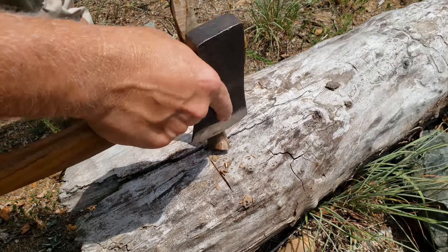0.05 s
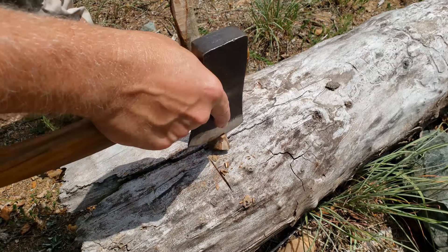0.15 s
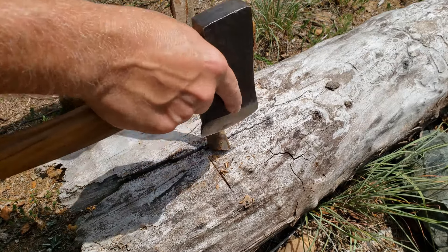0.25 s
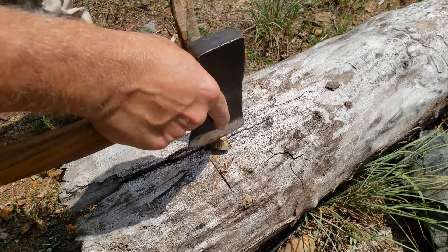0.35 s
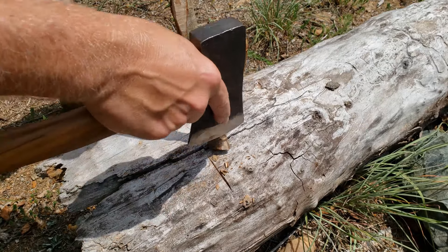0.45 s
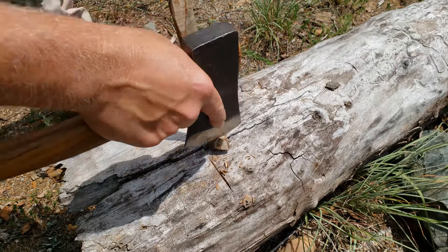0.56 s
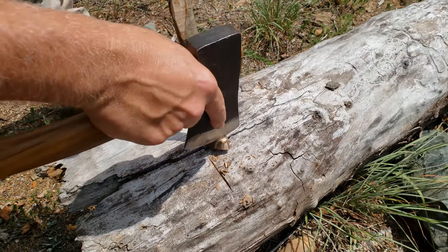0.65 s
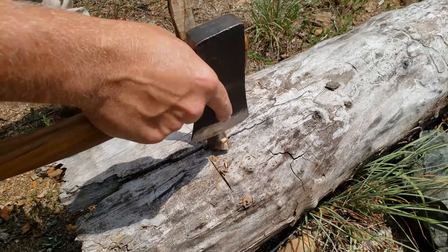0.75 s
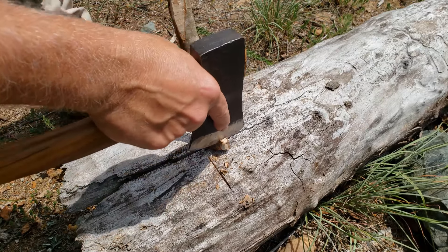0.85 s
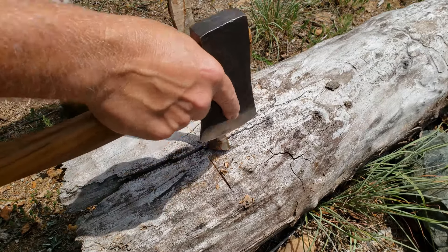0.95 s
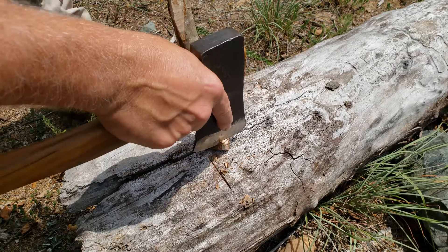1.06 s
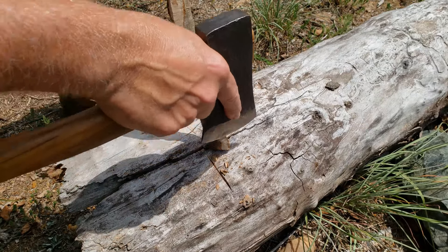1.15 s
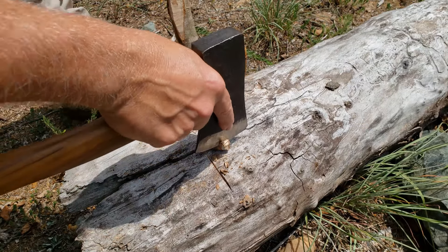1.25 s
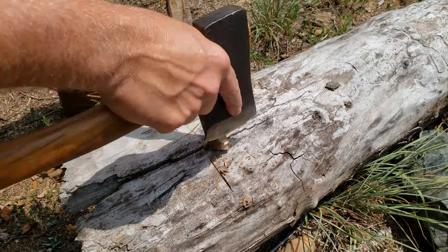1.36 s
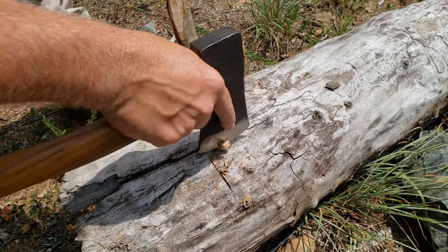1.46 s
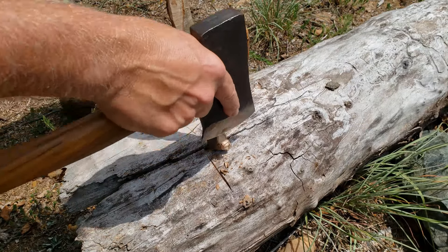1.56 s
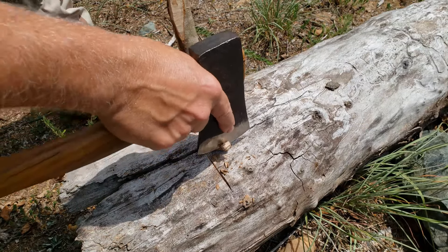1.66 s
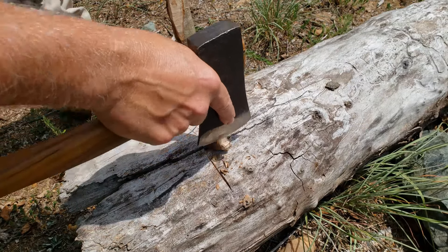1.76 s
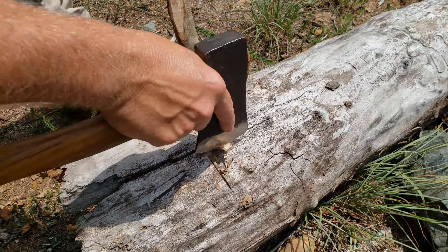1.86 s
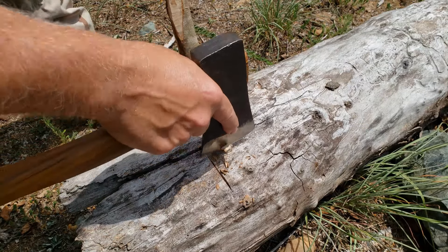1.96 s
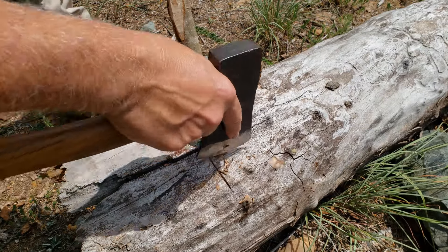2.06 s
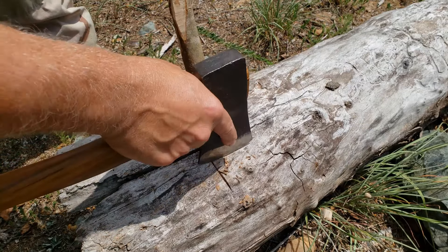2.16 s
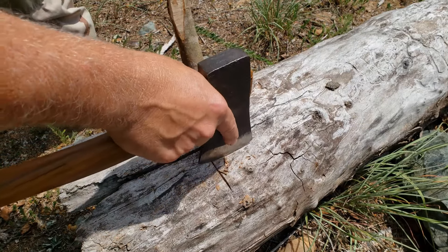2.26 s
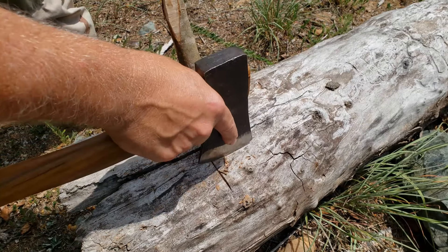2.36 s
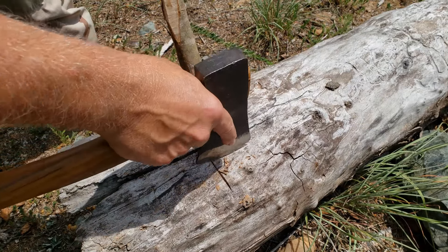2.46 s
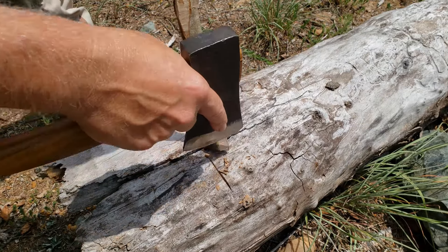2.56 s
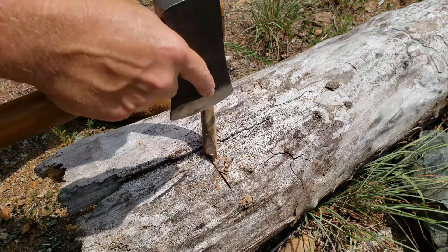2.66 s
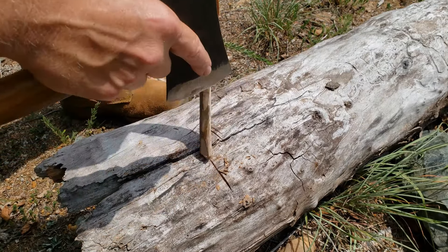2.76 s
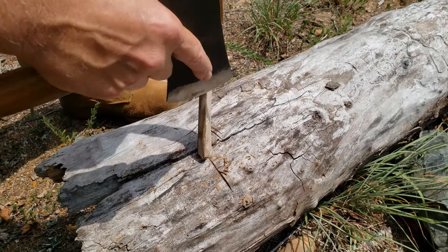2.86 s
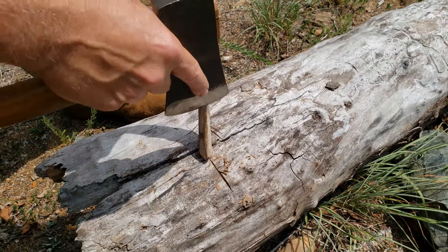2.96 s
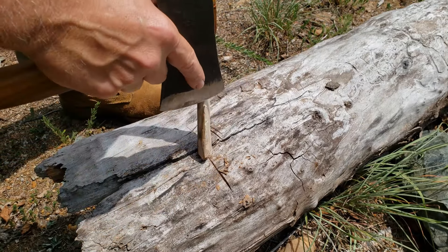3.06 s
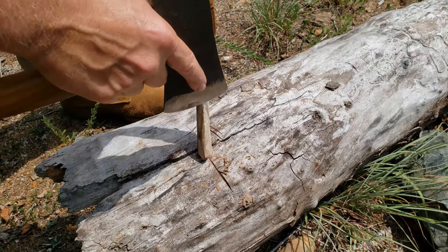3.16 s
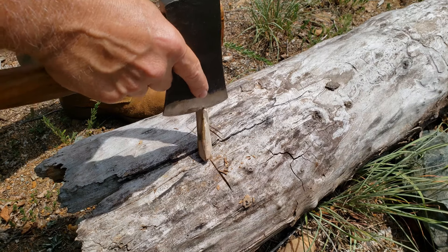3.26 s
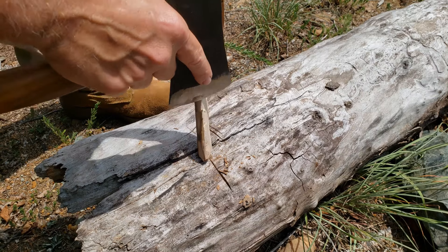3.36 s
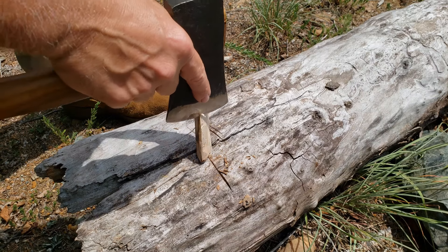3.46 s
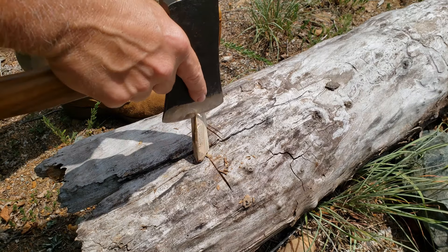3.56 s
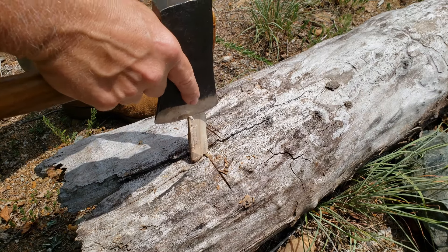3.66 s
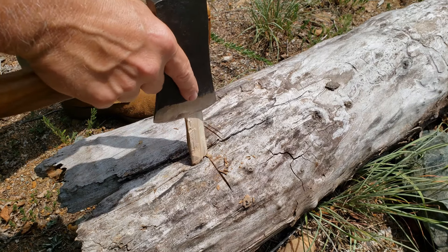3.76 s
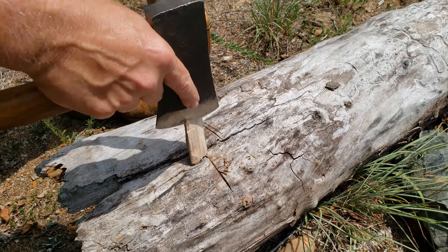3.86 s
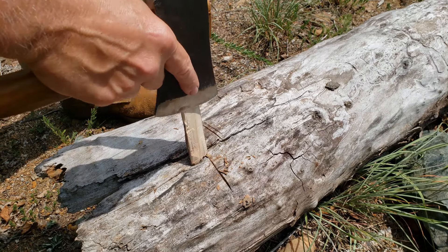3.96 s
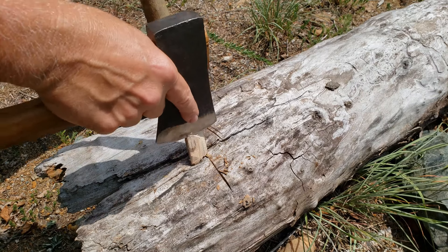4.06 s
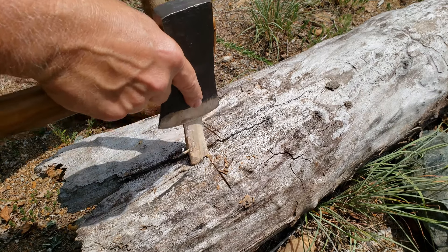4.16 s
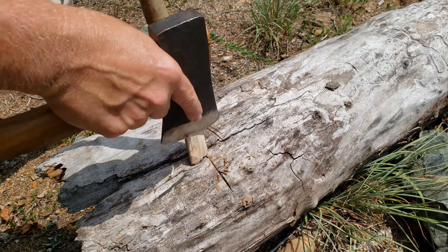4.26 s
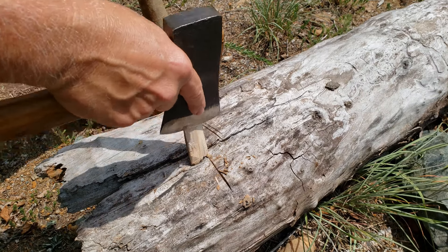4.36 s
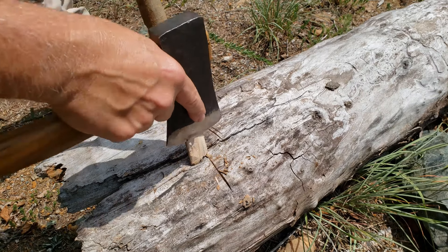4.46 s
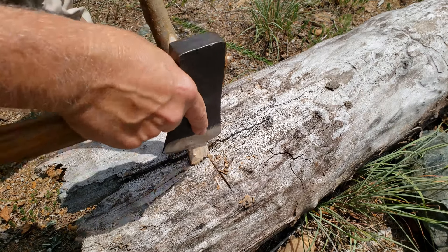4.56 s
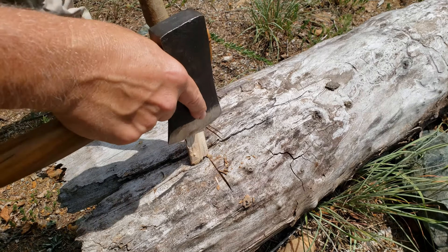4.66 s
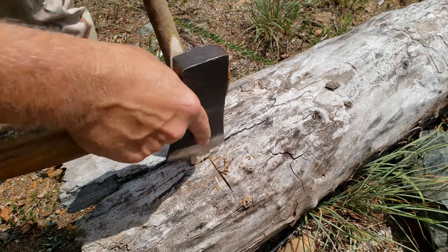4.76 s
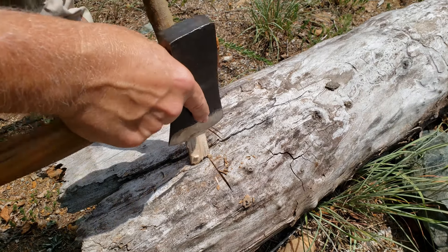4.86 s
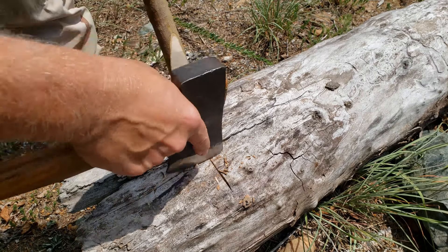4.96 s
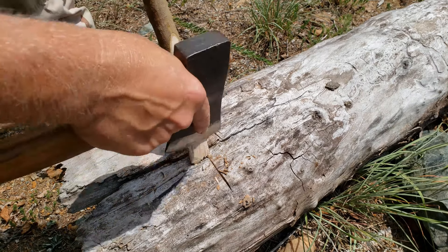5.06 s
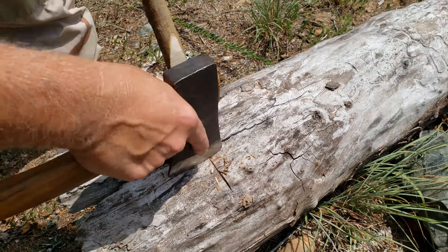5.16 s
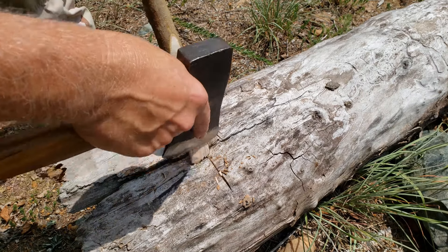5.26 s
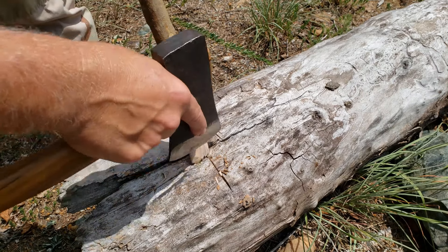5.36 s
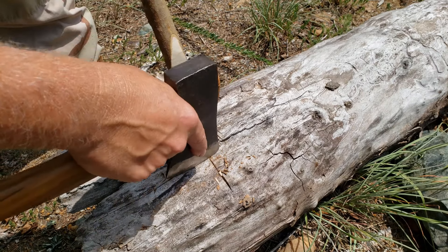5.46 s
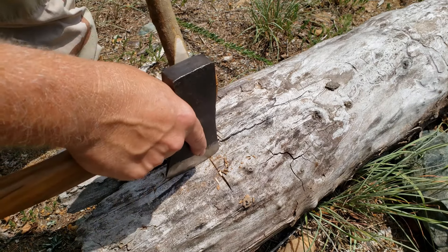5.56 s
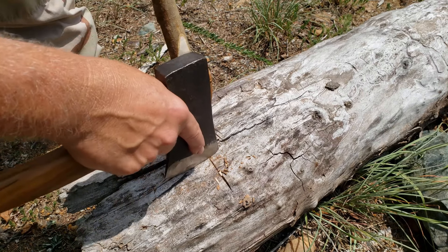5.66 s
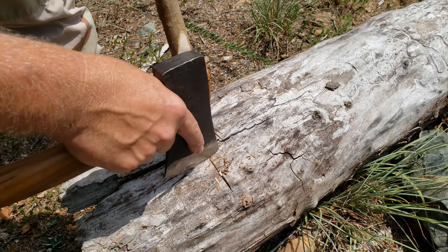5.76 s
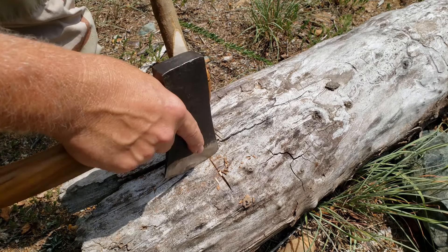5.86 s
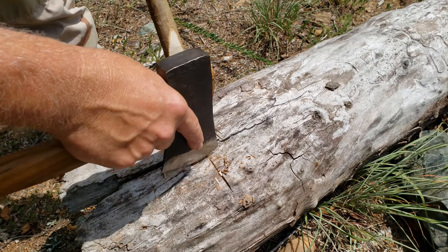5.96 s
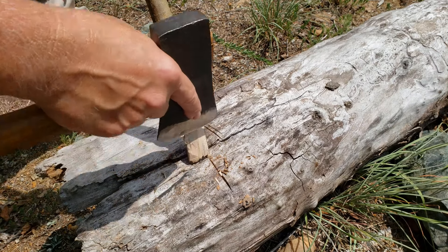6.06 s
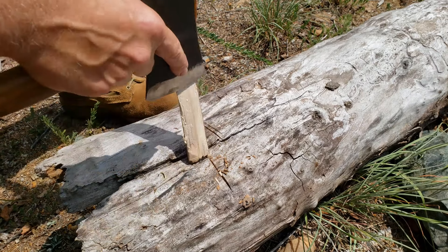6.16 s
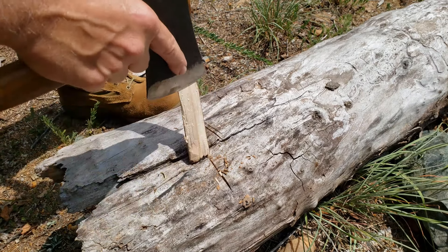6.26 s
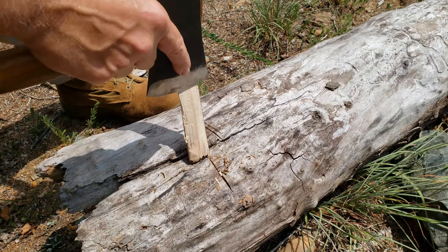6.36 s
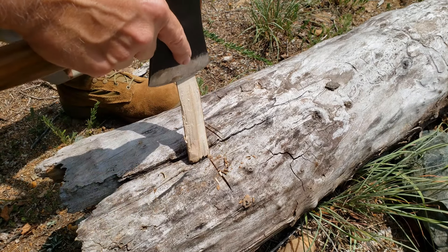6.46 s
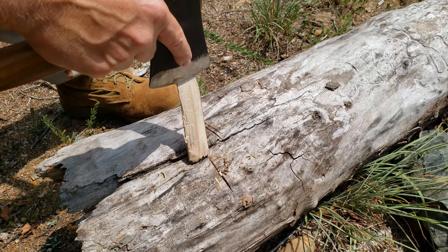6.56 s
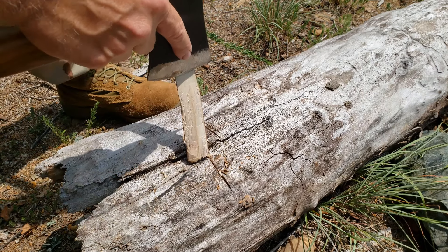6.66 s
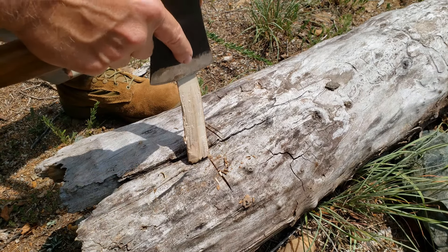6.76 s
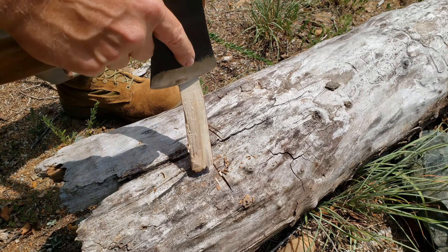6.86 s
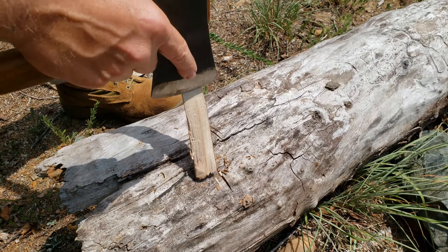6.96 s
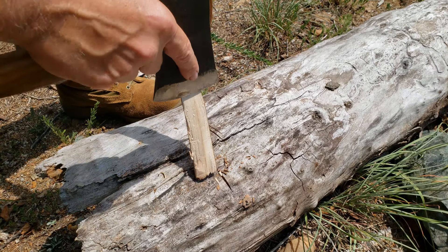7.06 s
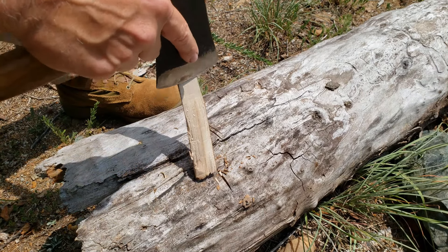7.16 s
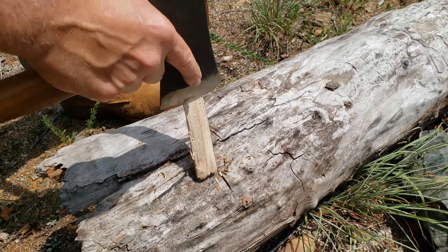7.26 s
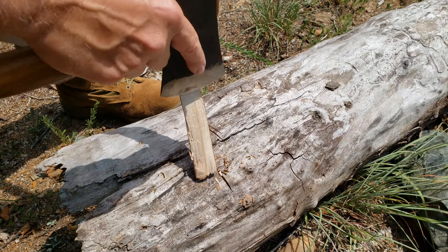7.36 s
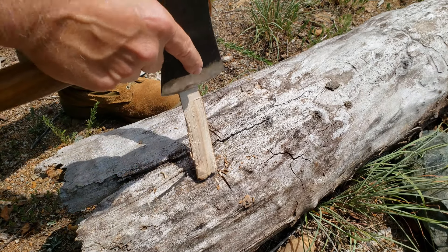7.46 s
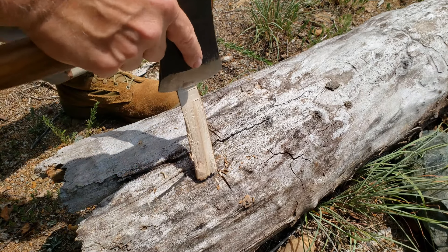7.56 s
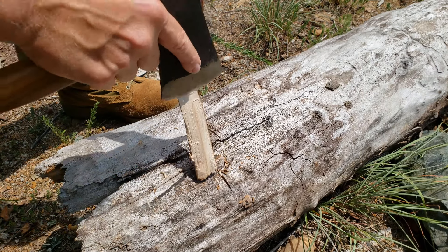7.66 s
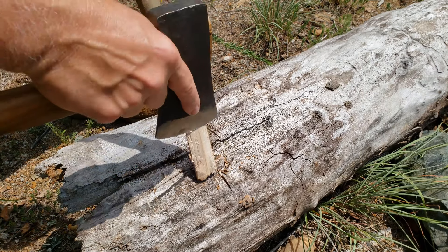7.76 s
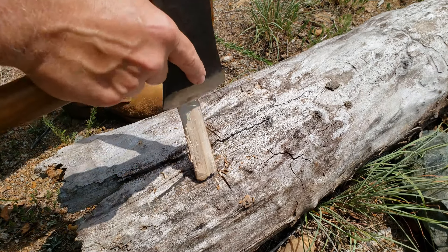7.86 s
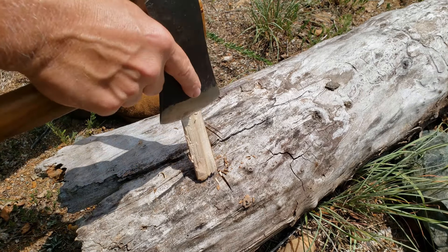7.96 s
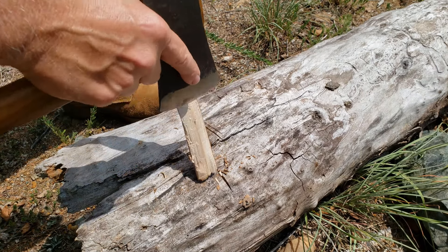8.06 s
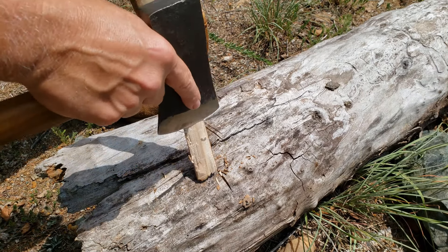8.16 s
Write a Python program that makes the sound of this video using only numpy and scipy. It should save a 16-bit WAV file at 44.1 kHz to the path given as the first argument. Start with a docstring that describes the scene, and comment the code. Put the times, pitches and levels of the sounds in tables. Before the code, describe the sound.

A hatchet works on a dry stick standing on a log, close by outdoors and slightly to the left. From the start to about 2.4 seconds comes a quick, even run of about a dozen blows, roughly five a second, growing louder. Each is a sharp crack of steel into wood with a hollow thud from the log. After a short lull, light taps and small scrapes begin around 3.2 seconds. From 4 to 6 seconds the blade shaves the stick in quick, quiet rasping strokes, with creaks and hissing fibres, and three firmer knocks land between 5.2 and 5.6 seconds. Faint ticks and brief scrapes follow from 6 to 7.4 seconds. Then about four moderate knocks mix with rasps until just after 8 seconds. Underneath, light wind rumbles on the microphone over a faint outdoor hush.

```python
"""Hatchet on a dry stick

Close by, outdoors, a hatchet chops and shaves a dry stick that stands on a hollow-sounding log.
The edge cracks into the stick, ringing wood and steel, and drives it against the log, which thuds.
As the edge slides it sticks and slips, rasping and tearing fibres. Light wind rumbles on two
microphone ports over a faint outdoor hush."""
import sys
import numpy as np
from scipy import signal
from scipy.fft import rfft, irfft
from scipy.io import wavfile
from scipy.ndimage import uniform_filter1d

SR = 44100
rng = np.random.default_rng(int(sys.argv[2]) if len(sys.argv) > 2 else 0)


def dump(signal):
    """Clip the signal to [-1, 1] and save it as 16-bit WAV at the path in sys.argv[1]."""
    limited = np.clip(np.atleast_2d(signal).T, -1, 1)
    pcm = np.round(limited * 32767).astype(np.int16)
    wavfile.write(sys.argv[1], SR, pcm)


N = 362502


def gain_of(db):
    """Decibels to gain."""
    return 10 ** (np.asarray(db) / 20)

def unit_rms(x):
    """Scales to rms 1."""
    return x / np.sqrt(np.mean(x ** 2) + 1e-20)

def curve_at(points, hz):
    """Reads a curve on a log frequency axis."""
    freqs, values = np.transpose(points)
    return np.interp(np.log(hz + 1), np.log(freqs + 1), values)

def colour(x, response):
    """Multiplies the spectrum by a function of frequency."""
    return irfft(rfft(x) * response(np.fft.rfftfreq(N, 1 / SR)), N)

def eq(x, points):
    """Applies an EQ curve of (freq_hz, gain_db) points."""
    return colour(x, lambda hz: gain_of(curve_at(points, hz)))

def fader(points):
    """A gain ride through (time_s, level_db) points."""
    return gain_of(np.interp(np.arange(N) / SR, *np.transpose(points)))

def add(mix, start_s, sound):
    """Mixes a sound in at start_s."""
    part = mix[round(start_s * SR):][:len(sound)]
    part += sound[:len(part)]

def ring(modes, push, spread=0., polarity=1):
    """Dying modes struck by a push, peak 1; spread varies pitch and level, polarity -1 alternates signs."""
    t = np.arange(6000) / SR
    body = np.zeros(len(t))
    for k, (hz, db, t60) in enumerate(modes):
        detune, accent = spread * rng.standard_normal(2)
        decay = gain_of(db + 100 * accent - 60 * t / t60)
        body += polarity ** k * decay * np.sin(2 * np.pi * hz * (1 + detune) * t)
    out = signal.oaconvolve(body, push)[:len(t)]
    return out / abs(out).max()

def air_noise(spectrum, correlation, patchy_db):
    """Stereo noise with drifting patches in its spectrum, rms 1."""
    frames, hz = N // 256 + 5, np.fft.rfftfreq(1024, 1 / SR)
    a, b, c, d, patches = rng.standard_normal((frames, 513, 5)).T
    patches = unit_rms(uniform_filter1d(uniform_filter1d(patches, 12, 0), 14, 1))
    shared = np.clip(curve_at(correlation, hz), 0, 1)[:, None]
    left = a + 1j * b
    right = shared * left + np.sqrt(1 - shared ** 2) * (c + 1j * d)
    spectra = np.array([left, right]) * gain_of(patchy_db * patches)
    stereo = signal.istft(spectra, nperseg=1024, noverlap=768)[1][:, :N]
    return unit_rms(eq(stereo, spectrum))


# Wind tone: freq_hz, gain_db
WIND_EQ = [(12, -60), (20, -16.5), (43, -4), (81, -4), (118, -6.5), (170, -12.5), (195, -15), (329, -23),
           (362, -37), (500, -31), (650, -56), (1100, -120)]
# Likeness of left and right: freq_hz, correlation
WIND_CORRELATION = [(30, .55), (70, 0.72), (150, .95)]
# Gusts: time_s, level_db
GUSTS = [(0.0, -48), (0.2, -56.5), (0.39, -57), (0.62, -54), (0.8, -47), (2.15, -53), (2.98, -55.5),
         (4.74, -53.5), (5.24, -51.5), (5.95, -47.5), (6.45, -50.5), (6.98, -50), (7.44, -51),
         (8.22, -51.5)]

def wind():
    """Light gusts rumble on the microphone ports."""
    return fader(GUSTS) * air_noise(WIND_EQ, WIND_CORRELATION, patchy_db=-0.5)


# Hush tone: freq_hz, gain_db
HUSH_EQ = [(180, -39.5), (300, -7), (355, -9.5), (658, -20.5), (1200, -22.5), (1490, -25.5), (2870, -26.5),
           (3060, -29), (3680, -32.5), (7310, -26), (8350, -40), (15200, -34), (16300, -43.5)]
# Hush swells: time_s, mid_band_db
HUSH_SWELLS = [(0.0, -70), (0.43, -78), (2.27, -71.5), (2.61, -78), (4.53, -71.5), (4.83, -66), (5.47, -62),
               (5.7, -71), (6.71, -77), (8.22, -76.5)]

def hush():
    """A faint outdoor bed, narrow in the lows and wide in the highs."""
    bed = air_noise(HUSH_EQ, correlation=[(300, 0.89), (8000, 0.15)], patchy_db=0.55)
    mid_band = colour(bed, lambda hz: (hz > 700) * (hz < 2600))
    return fader(HUSH_SWELLS) * bed / np.sqrt(np.mean(mid_band ** 2))


def slips(per_s, spread_db):
    """Stick-slip clicks of random sign and uneven size, in clumps."""
    clumps = gain_of(1.7 * unit_rms(uniform_filter1d(rng.standard_normal(N), 250)))
    size = gain_of(spread_db * np.minimum(rng.exponential(1, N), 4)) * rng.standard_normal(N)
    return clumps * size * (rng.random(N) < per_s / SR)

def resonances(x, peaks, waver_db):
    """Narrow peaks, each swelling and fading by itself as the edge travels; rms 1."""
    out = np.zeros(N)
    for pitch, width, db in peaks:
        waver = unit_rms(uniform_filter1d(uniform_filter1d(rng.standard_normal(N), 1500), 1500))
        band = colour(x, lambda hz: 1 / (1 + (2 * (hz - pitch) / width) ** 2))
        out += gain_of(db + waver_db * waver) * band
    return unit_rms(out)


# Tone of scraped wood: freq_hz, gain_db
RASP_EQ = [(350, -43), (600, 3), (963, -11.5), (1070, 2.5), (1370, -16), (1500, -29.5), (2120, -10.5),
           (2400, -5.5), (3170, -15.5), (4060, -11.5), (7000, -19), (9100, -35.5), (15400, -120)]
# Stick resonances under the slips: pitch_hz, width_hz, level_db
CREAK_PEAKS = [(1250, 130, 0), (1626, 500, -5.5), (2075, 190, -3), (3720, 360, -7), (4860, 250, -13)]

def wood_rasp(friction):
    """Slips rasp and creak on the stick; the grain colours the rasp in patches."""
    spectra = signal.stft(unit_rms(eq(friction, RASP_EQ)), nperseg=256)[2]
    grain = unit_rms(uniform_filter1d(uniform_filter1d(rng.standard_normal(spectra.shape), 2, 0), 16, 1))
    rasp = unit_rms(signal.istft(spectra * gain_of(9.0 * grain), nperseg=256)[1][:N])
    return unit_rms(rasp + 1.1 * resonances(friction, CREAK_PEAKS, waver_db=5))


# The steel head sings: pitch_hz, width_hz, level_db
SONG_PEAKS = [(3096, 200, 0), (7270, 580, -11), (8630, 120, -13.5)]
# Tone of tearing fibres: freq_hz, gain_db
FIBRE_EQ = [(3240, -18), (5500, -6.5), (6480, -8), (7600, -10), (8900, -7), (9360, -17), (11600, -9),
            (12600, -12.5), (15100, -14.5), (16300, -23)]
# Slides of the edge: peak_s, rise_s, fall_s, rasp_db, then relative to it song_db, hiss_db, rumble_db
STROKES = [(0.003, .003, .03, -52, 4, -10, 20), (0.145, .01, 0.078, -57, 0, 1.5, 9.5),
           (1.041, 0.0044, 0.006, -40, -4, 5, 16), (1.52, .02, .07, -67.5, -9, 5, 3),
           (1.729, 0.075, 0.039, -59, -9, -7.5, 0.5), (1.93, .07, 0.043, -62, -7, -0.8, 8),
           (2.101, 0.058, 0.039, -58, -5.5, 0, 1), (2.455, 0.0072, 0.077, -64.5, -16, 1, 1),
           (3.167, .003, 0.037, -60.5, 13, -15, 12.5), (3.4, 0.079, 0.015, -68.5, 5.5, -24, 4),
           (3.642, 0.038, 0.051, -55, 0, -2.1, 9), (3.999, .09, 0.12, -63.5, -14, -3, 7),
           (4.187, 0.0079, 0.051, -52.5, 4, -20, -4.5), (4.28, 0.034, 0.022, -47, 6.5, -0.3, 12.5),
           (4.421, .004, 0.033, -58.5, 2.5, -11, 13.5), (4.494, 0.0364, 0.03, -50.5, 7.5, 2, 9),
           (4.633, 0.064, .037, -57, -3, -14, 4), (4.706, 0.041, 0.055, -50, -0.5, 1.5, 11),
           (4.85, 0.074, 0.041, -49.5, -7, -8.5, -3.5), (4.944, 0.045, 0.016, -47.5, 1.5, 4, 2.5),
           (5.036, 0.036, 0.11, -51, 0, -13, -1.5), (5.172, 0.057, 0.013, -47.5, 0, 6.2, 14),
           (5.271, 0.066, 0.06, -49, -1, -7, -2), (5.375, .055, 0.0079, -42, -16, -1, 7),
           (5.5, 0.08, 0.076, -49.5, -3, -3, 2), (5.626, 0.064, 0.011, -48, 4, 4.5, 1),
           (5.715, 0.18, 0.4, -64.5, -27, 1.1, -1), (6.405, .004, .03, -65, 1, -14, 6),
           (6.475, 0.033, 0.084, -62, 6.5, -6.5, 6.5), (6.637, 0.063, 0.05, -65, 5, -21, 6),
           (6.734, 0.017, 0.012, -63, 14, -21, 10), (6.86, 0.035, 0.056, -78, 14, -8.5, 10),
           (6.956, 0.013, 0.018, -64, 12.5, -8, 7.5), (7.16, 0.021, 0.034, -62, 3, -6, 18.5),
           (7.224, 0.06, 0.021, -58.5, 0, -12, -6), (7.358, 0.054, 0.03, -61, 9, -16, 3.5),
           (7.433, 0.057, 0.015, -54, 0, -8, 1), (7.485, 0.045, 0.011, -45, 3, -9, 7),
           (7.682, 0.0035, 0.046, -62, -19, -7, 16), (7.915, 0.034, 0.052, -41, 6.5, -5.5, 2.5),
           (7.985, 0.0072, 0.029, -71, -22, -11, 16), (8.124, 0.0061, 0.086, -47.5, -1.5, -8, 0.5)]

def shaving_strokes():
    """The edge slides along the stick: wood rasps, the head sings, fibres hiss, the log rumbles."""
    start_db, end_db, fade_in_share, fade_out_s = -14, -15, 0.46, 0.0013
    settle_db, settle_db_per_s, settle_s = -8.5, 350, .08
    friction = slips(per_s=9000, spread_db=3.4)
    rasp = wood_rasp(friction)
    song = resonances(friction, SONG_PEAKS, waver_db=6.5)
    hiss = unit_rms(eq(1.4 * friction + slips(14000, 0.52), FIBRE_EQ))
    rumble = unit_rms(signal.oaconvolve(slips(690, 3.0), ring(LOG_MODES[2:5], np.hanning(50)))[:N])
    out = np.zeros(N)
    for peak_s, rise_s, fall_s, rasp_db, song_db, hiss_db, rumble_db in STROKES:
        start_s, end_s = max(peak_s - rise_s, 0), peak_s + fall_s
        span = np.arange(round(start_s * SR), min(round((end_s + settle_s) * SR), N))
        t = span / SR
        swell_db = np.interp(t, (start_s, peak_s, end_s), (start_db, 0, end_db))
        after_s = np.maximum(t - end_s, 0)  # light contact lingers after the stroke
        tail_db = settle_db * np.minimum(after_s / .004, 1) - settle_db_per_s * after_s
        fade_in = (t - t[0]) / (fade_in_share * rise_s)
        fades = np.clip(np.minimum(fade_in, (t[-1] - t) / fade_out_s), 0, 1)
        layers = (gain_of(swell_db) * rasp[span]  # the other layers follow most of this swell
                  + gain_of(song_db + .85 * swell_db) * song[span]
                  + gain_of(hiss_db + .92 * swell_db) * hiss[span]
                  + gain_of(rumble_db + .8 * swell_db) * rumble[span])
        out[span] += fades * gain_of(rasp_db + tail_db) * layers
    return out


# Body of the log: pitch_hz, level_db, t60_s
LOG_MODES = [(136.5, -9.5, 0.076), (202.6, -0.06, 0.081), (267.2, 1.5, 0.096), (399.5, 0.5, .05),
             (518.5, -1.16, 0.034), (639, -11, 0.036)]
# Blows on the log: start_s, knock_db, boom_db, boom_lag_s
THUDS = [(0.001, -37, -37.5, 0.00048), (0.1153, -26, -25.5, 0.011), (0.3334, -21.5, -22.5, .006),
         (0.586, -19, -23, .008), (0.814, -15.5, -19.5, .009), (1.0305, -18.5, -19, .01),
         (1.2546, -14.5, -16.5, .003), (1.4543, -15.5, -18, .018), (1.6489, -18.5, -17.5, .012),
         (1.84, -17, -19, .011), (2.0146, -24, -26, 0.00052), (2.0343, -17, -20.5, 0.0079),
         (2.2055, -19, -16.5, .004), (2.233, -10.5, -8.5, .003), (2.3675, -18, -17.5, .01),
         (2.3906, -19.5, -14, .006), (3.163, -43.5, -42.5, 0.00078), (3.413, -41, -35, 0.0016),
         (3.591, -40, -41, 0.0063), (3.647, -44, -34, 0.00099), (3.951, -50, -38, 0.0012),
         (4.262, -39, -48, 0.00062), (4.412, -53, -44, 0), (4.482, -38, -51, 0.0077),
         (4.681, -37, -33, 0.0011), (4.95, -34, -34, 0.00025), (5.174, -25.5, -21.5, 0.014),
         (5.339, -36.5, -44.5, 0), (5.3787, -23, -12.5, .006), (5.631, -16.5, -15, 0.0035),
         (5.6494, -52, -21.5, 0), (6.397, -39.5, -43, 0.0013), (6.737, -60.5, -42, 0.0025),
         (6.956, -65, -46, 0), (7.221, -48.5, -44, 0.0017), (7.469, -35, -37.5, 0.0059),
         (7.661, -32, -27, 0.0034), (7.874, -25.5, -27.5, .008), (7.8985, -25.5, -54, 0.0011),
         (8.1096, -31.5, -40, .01)]

def log_thuds():
    """The stick knocks on the log; the weight of the blow follows, booms and knocks again."""
    contact_s, first_boom_db, rebound_db, ground_db = .0012, -6, -2.5, -10.5
    push = np.sin(np.pi * np.arange(0, 1, 1 / (contact_s * SR))) ** 2
    lowest = gain_of(LOG_MODES[0][1]) * ring(LOG_MODES[:1], push)
    highest = gain_of(LOG_MODES[5][1]) * ring(LOG_MODES[5:], push)
    ground_thump = ring([(62, -6, 0.078), (89, 0.5, 0.13)], np.hanning(200))
    # Neighbouring modes radiate with opposite sign.
    boom = ring(LOG_MODES[1:3], push, polarity=-1) + lowest + gain_of(ground_db) * ground_thump
    knock = ring(LOG_MODES[3:5], push, polarity=-1) - highest
    out = np.zeros(N)
    for start_s, knock_db, boom_db, lag_s in THUDS:
        add(out, start_s, gain_of(knock_db) * knock + gain_of(boom_db + first_boom_db) * boom)
        add(out, start_s + lag_s, gain_of(knock_db + rebound_db) * knock + gain_of(boom_db) * boom)
    return out


# Steel head, damped by hand and wood: pitch_hz, level_db, t60_s
HEAD_MODES = [(2700, -12.5, 0.0068), (3097, -9, 0.012), (3601, -2.5, 0.0058), (4392, -4, 0.0027),
              (5090, -13.5, 0.0054), (5690, -9.5, 0.0039), (6160, -17, 0.0073)]
# Dry stick: pitch_hz, level_db, t60_s
STICK_MODES = [(1160, -11.5, 0.0098), (1190, -5.5, .014), (1643, -1, 0.0065), (1940, -11, 0.0033),
               (2300, -4, 0.0027)]
# Thin edge: pitch_hz, level_db, t60_s
EDGE_MODES = [(7080, -3.5, 0.0043), (7700, -6.5, 0.0023), (11300, -0.5, 0.0019), (12700, -5.5, 0.0033),
              (14700, -6, 0.0026)]
# Bites and ticks: start_s, head_db, then relative to it stick_db, edge_low_db, edge_high_db
BITES = [(0.0024, -45.5, 8.5, -23, -4.5), (0.1108, -39.5, 5.5, -33, -22), (0.128, -40.5, -7, 6, -29),
         (0.3351, -21, 2, -9.5, -15), (0.5874, -18.5, 1, -9, -15), (0.8138, -20, 5, -22, -15),
         (0.827, -21, -4, -7.5, -18), (1.0309, -13.5, -0.5, -35, -32.5), (1.2513, -6.5, -7.5, -19, -35),
         (1.4558, -20.5, 4, -25, -41), (1.4615, -35.5, 3.5, 2, -17.5), (1.6475, -27, 9, -11, -25),
         (1.6598, -29.5, -15, 3.5, 0), (1.839, -18.5, -1, -37, -13), (1.851, -24.5, -0.6, -2.5, -15),
         (2.0154, -23, -2, -32, -26), (2.0305, -22.5, -0.5, -5.5, -9.5), (2.207, -9, -11, -18, -33),
         (2.2218, -28, -1.8, 13, 9), (2.2326, -20, 3, -12, -1), (2.368, -13.5, -2.5, -19, -48),
         (2.391, -31.5, 8.5, -6, -3), (3.1655, -49.5, -3.5, -12, -18), (3.4123, -33, -9.5, 5, 7),
         (3.5926, -38.5, 5.5, -15, -53), (3.6938, -47, -14, 5.5, -9), (3.715, -41, -20, -6, -4),
         (3.8397, -58, -19, 11.5, -30), (4.0512, -39, -11, 0.5, -36), (4.415, -38, -8, -9, -33),
         (4.4875, -38, -21, 8, -26), (4.608, -44, -10, -6, -33), (4.688, -51, -13, -5, -13),
         (5.1755, -26.5, -4, -13, -4), (5.205, -48, -19, -13, 0), (5.3774, -25, 2.2, -10, -3.5),
         (5.6293, -21, 1.5, -3.5, -7), (5.8609, -54.5, 7, -31, -31), (6.028, -55, 5, -17, -16),
         (6.052, -56, 5, -5, -1.1), (6.071, -54.5, 0, 4, -9), (6.141, -63, 14.5, -27, -18.5),
         (6.2114, -64, 13, -19, -11), (6.3988, -29, -2.5, -38, -47), (7.142, -65.5, 15.5, 12, -13),
         (7.222, -58, 16, 2, -26), (7.464, -35, 3, -3, -24), (7.49, -47, 14.5, -16, -23),
         (7.6621, -33, 12, -4.5, -31), (7.8765, -28.5, 14.5, -35.5, -31), (7.893, -38.5, 15.5, -27, -22),
         (7.899, -29, 1, -19, -10), (8.111, -31, 3.5, -27, -27)]

def edge_bites():
    """A sharp contact and a dying burst of splinters ring head, stick and edge."""
    out, t = np.zeros(N), np.arange(1500) / SR
    for start_s, head_db, stick_db, edge_low_db, edge_high_db in BITES:
        splinter_s = 0.0055 * gain_of(-0.17 * (head_db + 28))  # harder blows splinter more briefly
        push = 0.44 * rng.standard_normal(len(t)) * np.exp(-t / splinter_s)
        push[0] = -2.0  # the contact
        for modes, part_db in ((HEAD_MODES, 0), (STICK_MODES, stick_db),
                               (EDGE_MODES[:2], edge_low_db), (EDGE_MODES[2:], edge_high_db)):
            add(out, start_s, gain_of(head_db + part_db) * ring(modes, push, spread=.01))
    return out


def reflections(x, tone, t60_s, onset_s=0.):
    """Random dying reflections; four sets crossfade, as hand and stick keep moving."""
    t, out = np.arange(round(t60_s * SR)) / SR, np.zeros(N)
    envelope = gain_of(-60 * t / t60_s) * np.clip((t - onset_s) / 0.0048 + .1, 0, 1)
    half_turns = 1.2 * np.arange(N) / SR
    for k in range(4):
        taps = rng.standard_normal(len(t)) * envelope
        crossfade = np.cos(np.pi * (half_turns + k / 4)) / np.sqrt(2)
        out += signal.oaconvolve(x * crossfade, taps / np.linalg.norm(taps))[:N]
    return eq(out, tone)


# Level lean to the left: freq_hz, left_minus_right_db
LEFT_LEAN = [(60, 1.5), (110, 1.5), (200, 2.5), (380, 0.5), (700, 2.5), (1290, 5), (2380, 7), (4400, 7),
             (8120, 0.5), (15000, 0)]
# Phase lead of the left port: freq_hz, lead_rad
LEFT_LEAD = [(200, 0.07), (800, 0.77), (1800, 1.4), (4000, 1.13), (8000, 1.964), (15000, 1.6)]
# Close scatter, opposite in sign at the two ports: freq_hz, gain_db
SCATTER_EQ = [(125, -26), (250, -18), (500, -14), (2000, -12), (8000, -9)]
# Echo off ground and brush: freq_hz, gain_db
ECHO_EQ = [(300, -29.5), (1500, -28.5), (4300, -22.5), (6500, -34.5), (14000, -42.5)]

def stereo_image(x):
    """Direct sound, louder and earlier at the left port, with close scatter and faint echoes."""
    scatter = reflections(x, SCATTER_EQ, t60_s=.015)
    channels = []
    for side in (1, -1):
        panned = colour(x, lambda hz: gain_of(side * curve_at(LEFT_LEAN, hz) / 2))
        direct = colour(panned, lambda hz: np.exp(.5j * side * curve_at(LEFT_LEAD, hz)))
        echo = reflections(x, ECHO_EQ, t60_s=.25, onset_s=.012)
        channels.append(direct + side * scatter + echo)
    return np.array(channels)


def scene():
    """Hatchet work over wind and hush; the hatchet sounds lose their deepest bass below about 70 Hz."""
    ambience = wind() + hush()
    hatchet = edge_bites() + log_thuds() + shaving_strokes()
    low_cut = signal.butter(2, 70, "high", fs=SR, output="sos")
    return ambience + stereo_image(signal.sosfilt(low_cut, hatchet))

def record(dry):
    """A steep high cut at 16 kHz."""
    high_cut = signal.firwin(511, 16000, window=("kaiser", 9), fs=SR)
    return signal.oaconvolve(dry, high_cut[None], "same")


dry = scene()
out = record(dry)
dump(out)
```